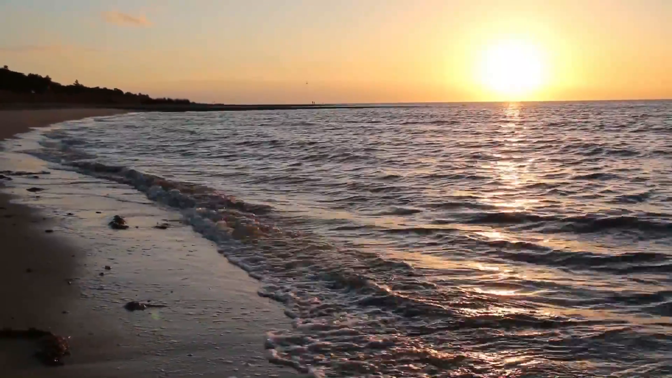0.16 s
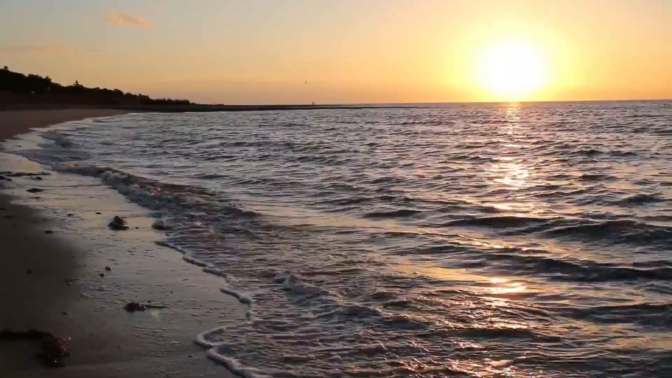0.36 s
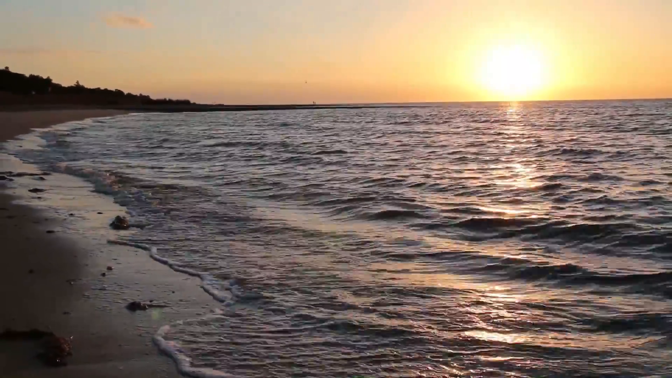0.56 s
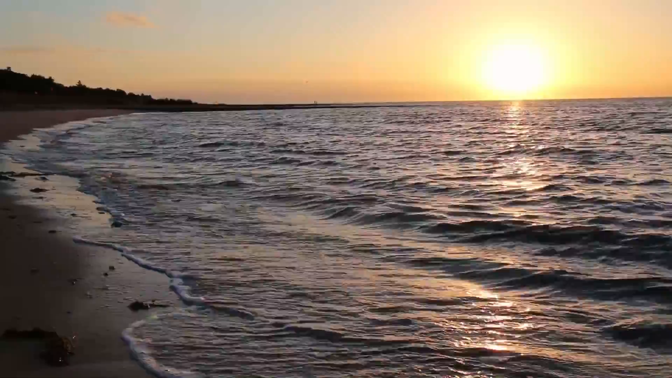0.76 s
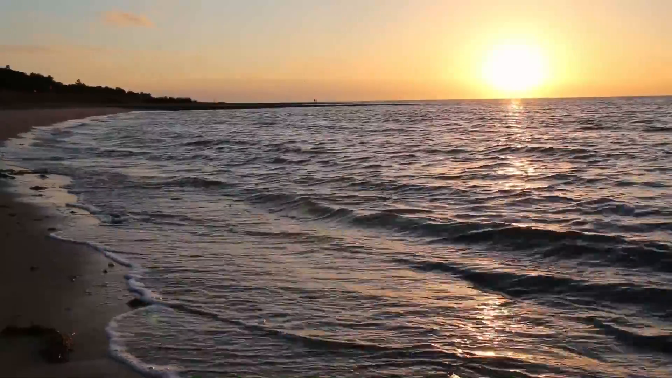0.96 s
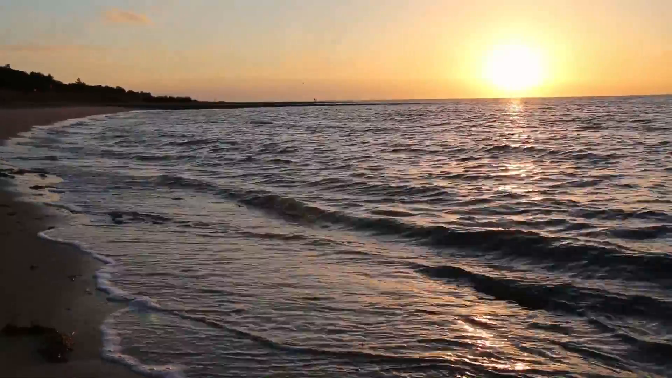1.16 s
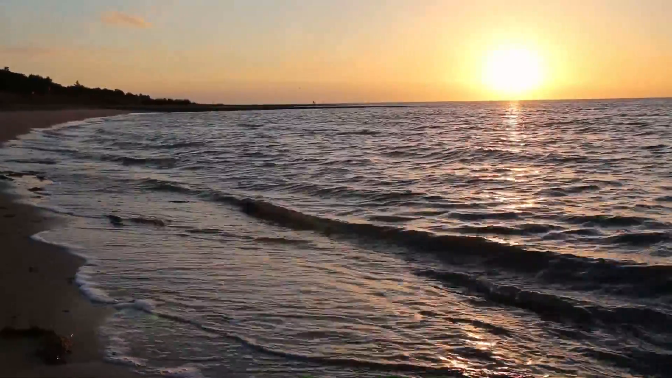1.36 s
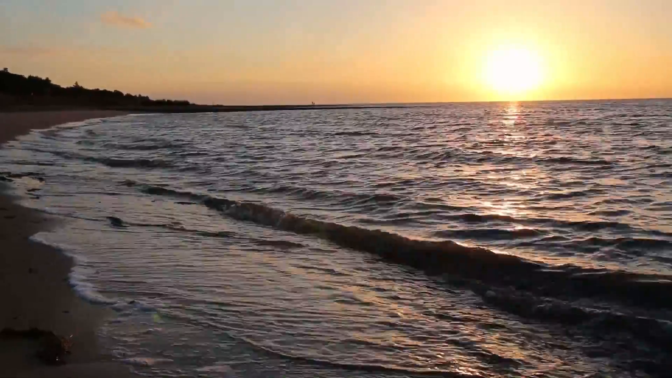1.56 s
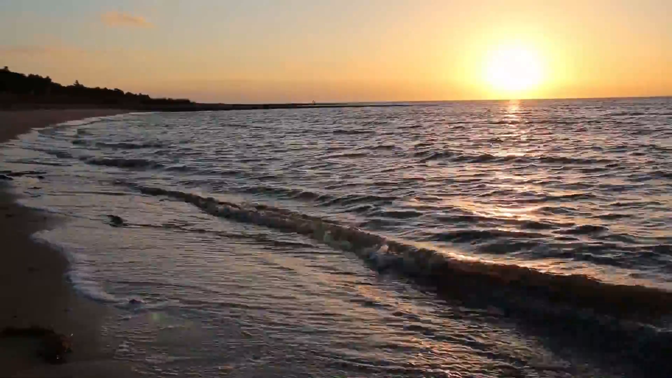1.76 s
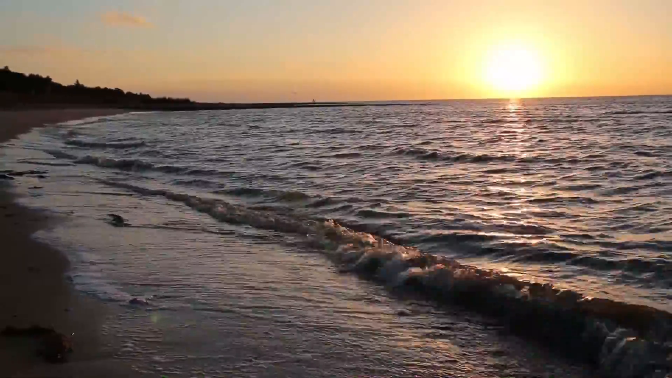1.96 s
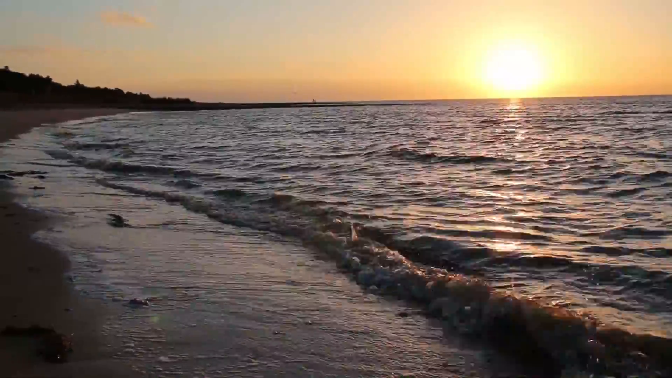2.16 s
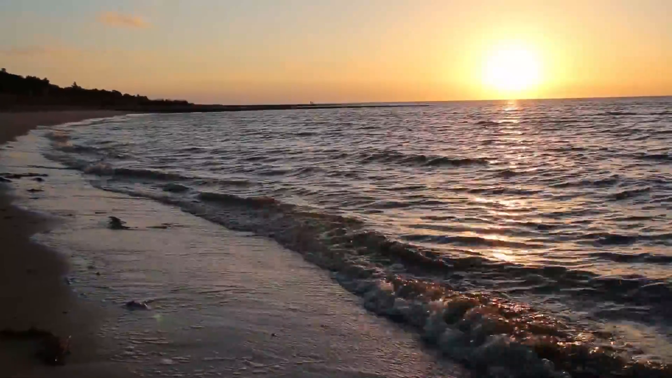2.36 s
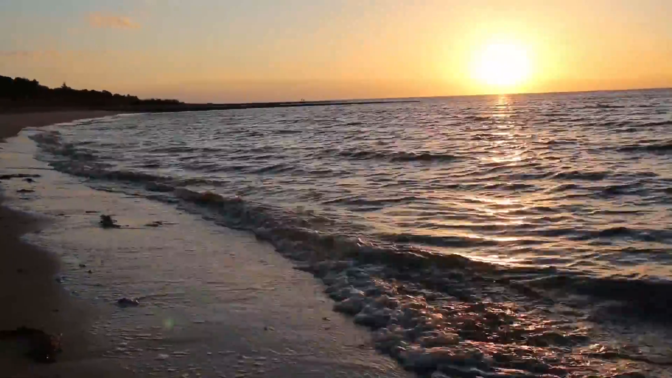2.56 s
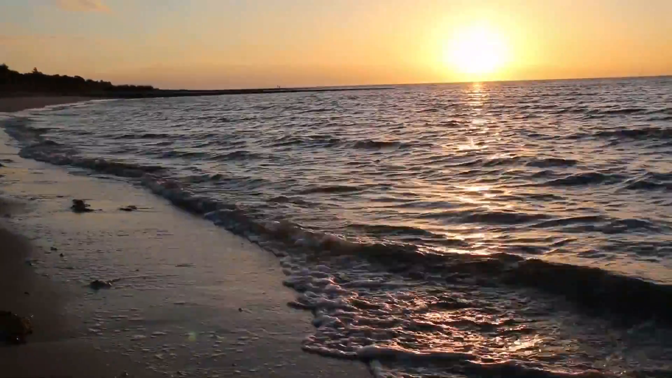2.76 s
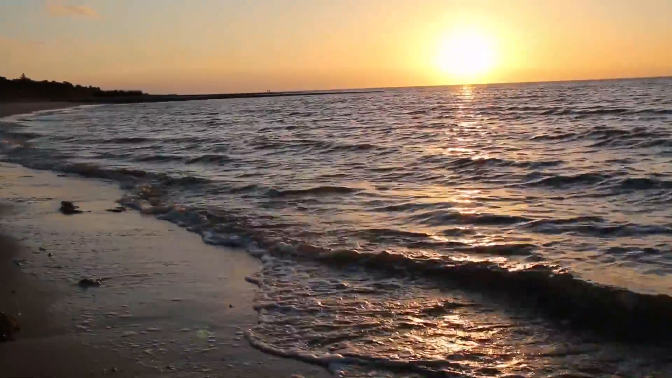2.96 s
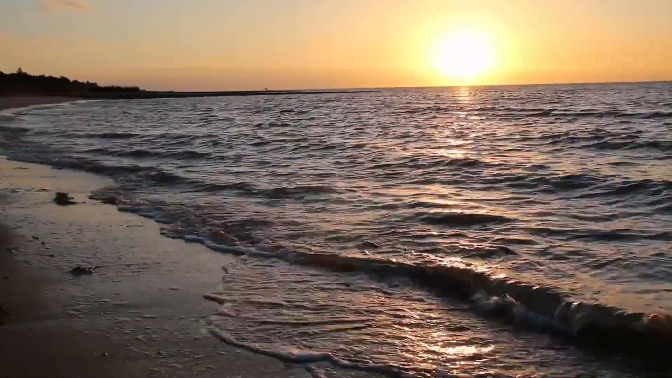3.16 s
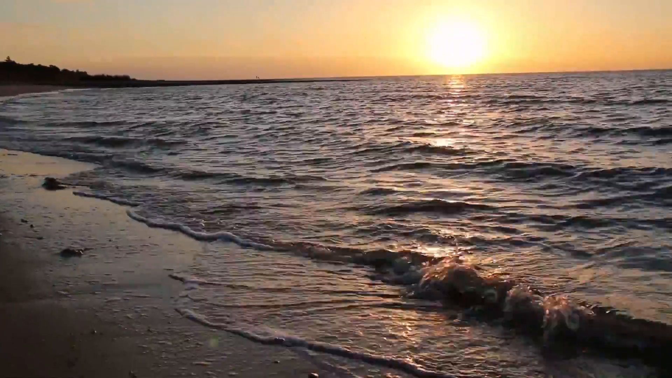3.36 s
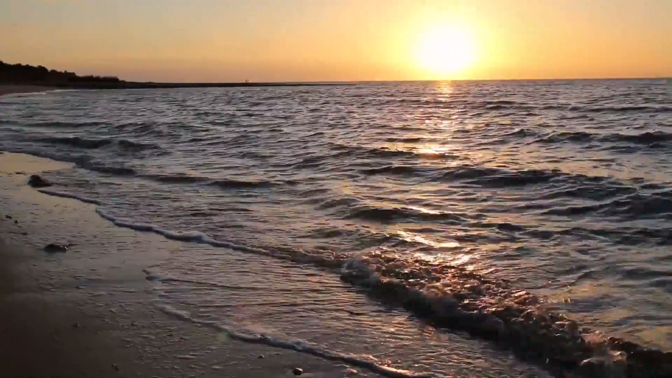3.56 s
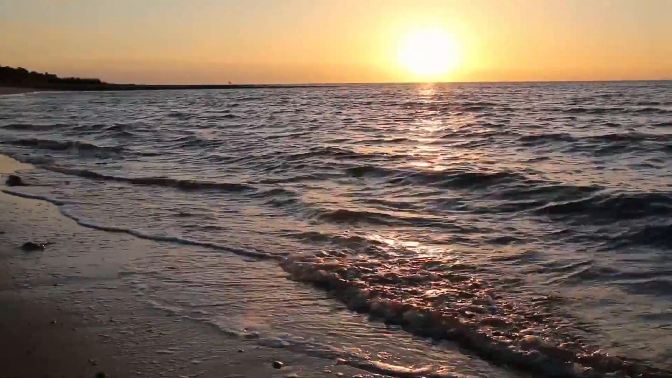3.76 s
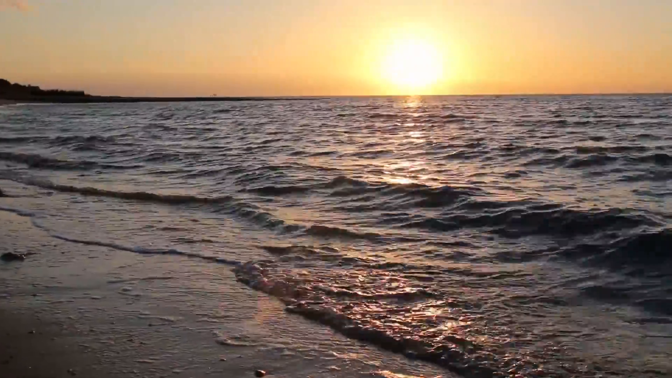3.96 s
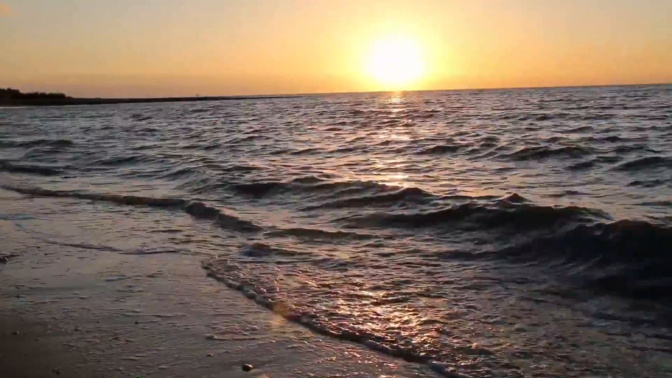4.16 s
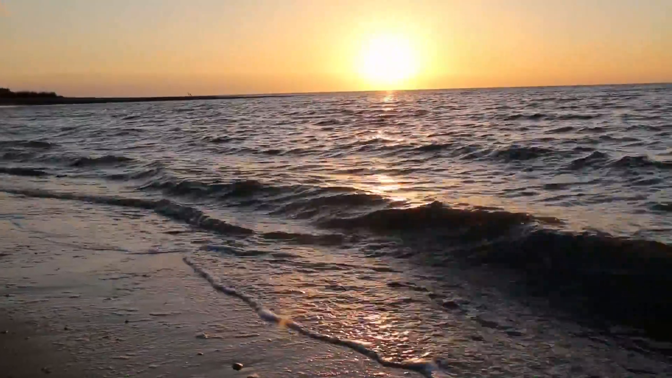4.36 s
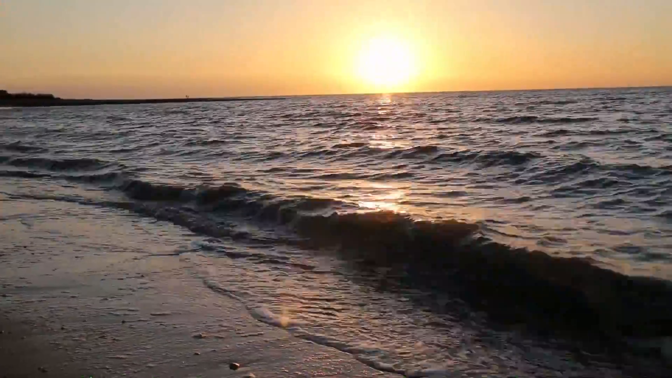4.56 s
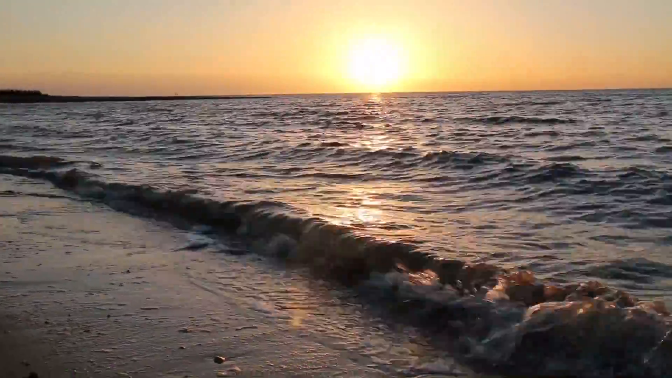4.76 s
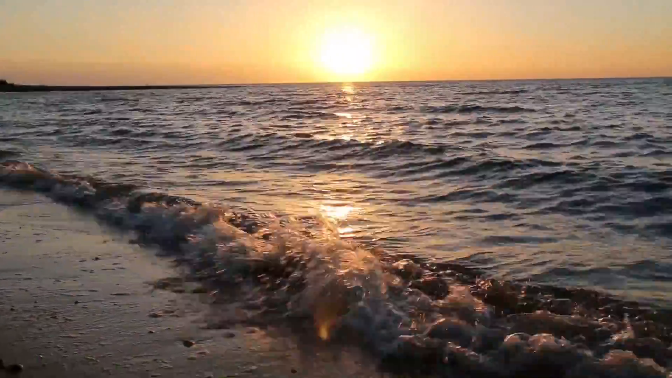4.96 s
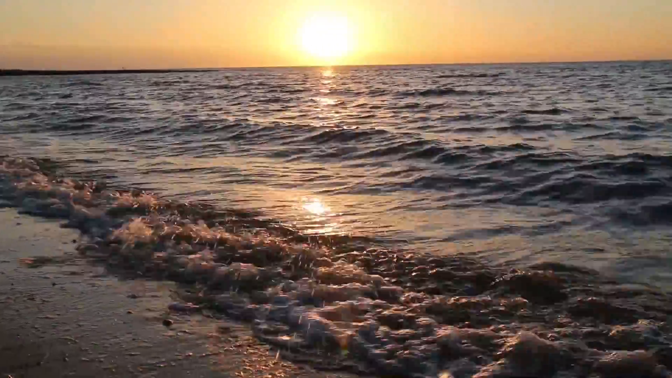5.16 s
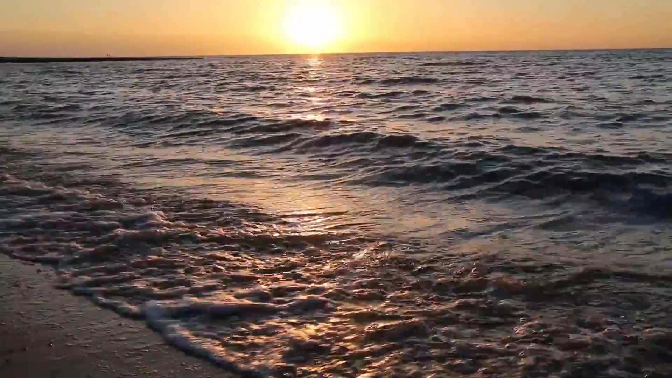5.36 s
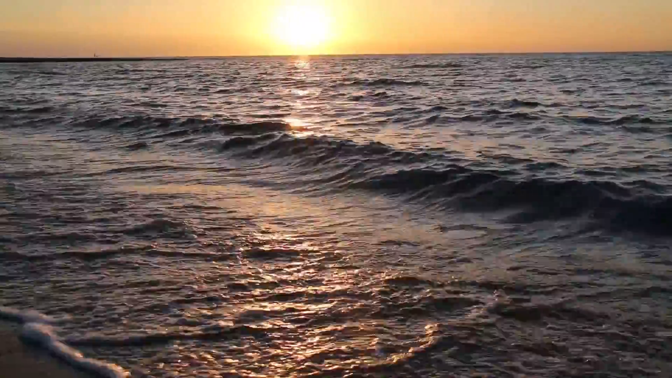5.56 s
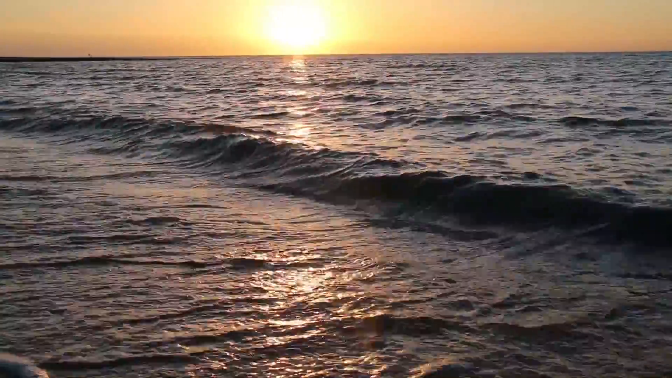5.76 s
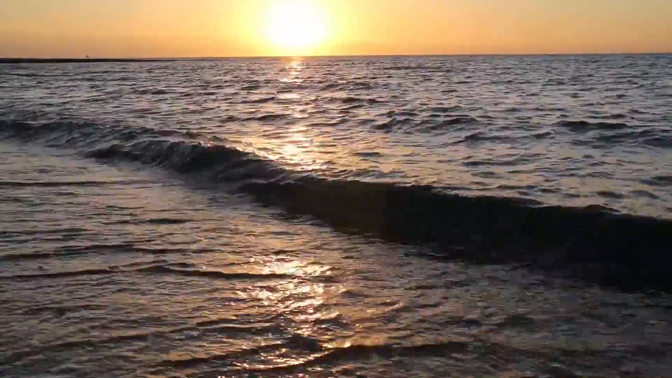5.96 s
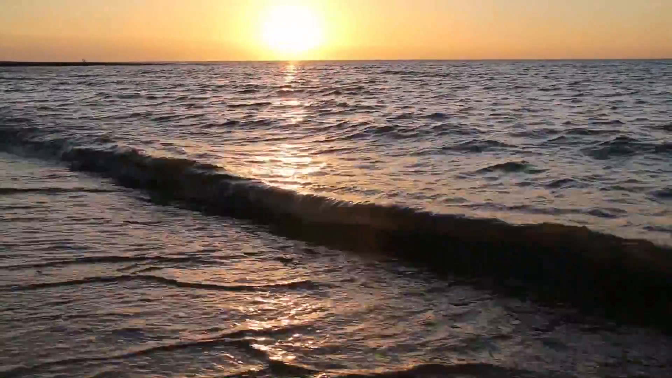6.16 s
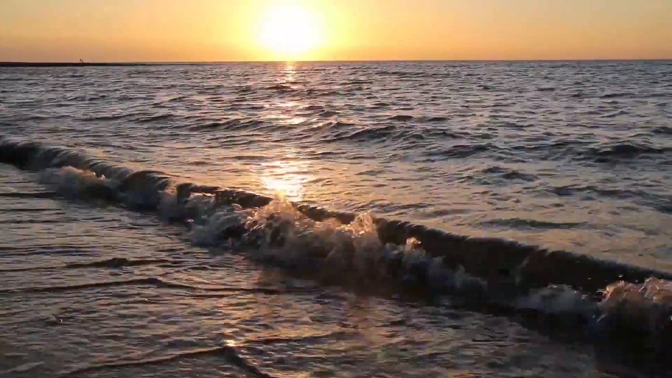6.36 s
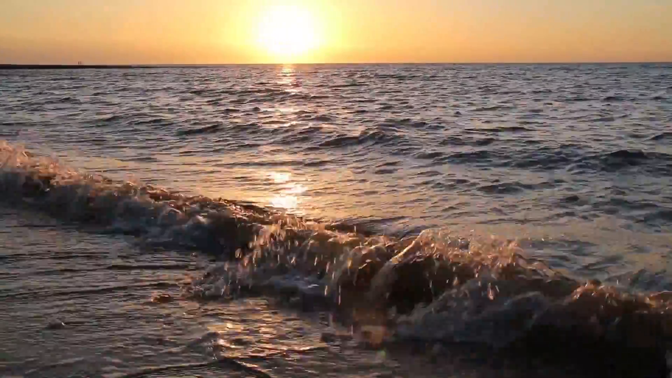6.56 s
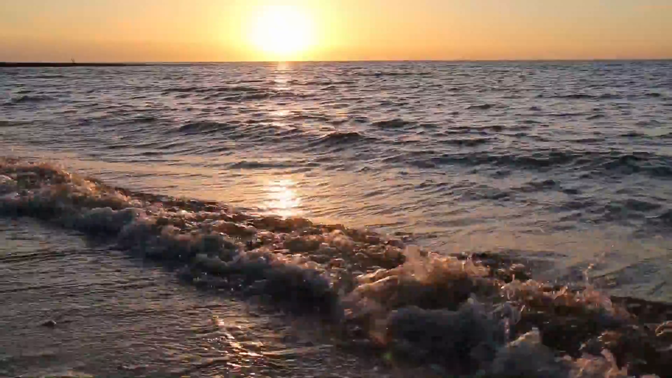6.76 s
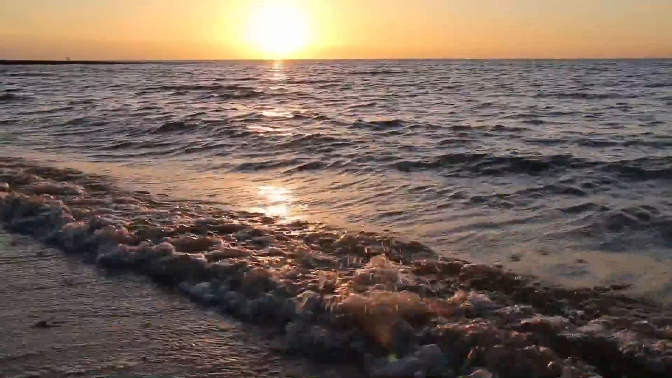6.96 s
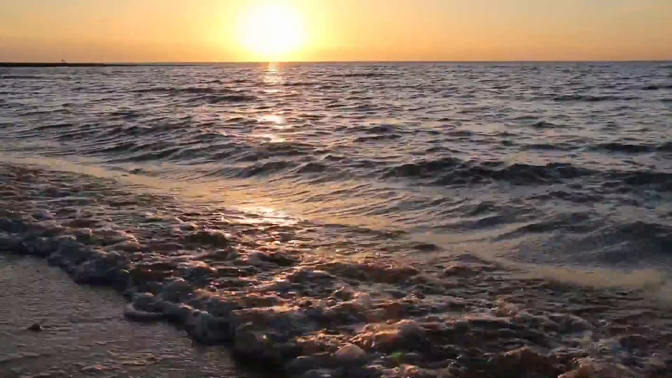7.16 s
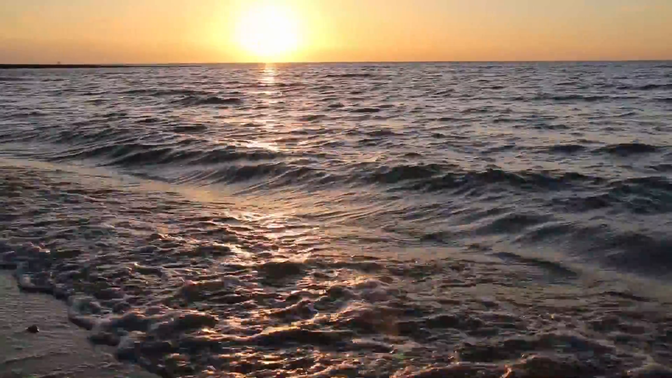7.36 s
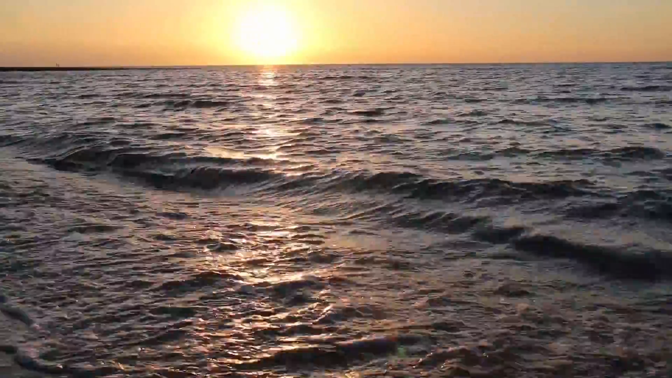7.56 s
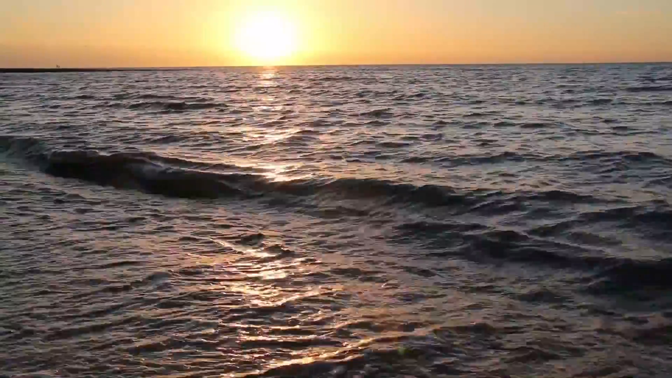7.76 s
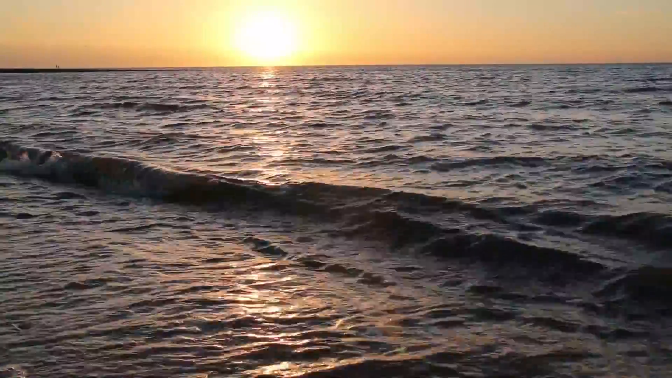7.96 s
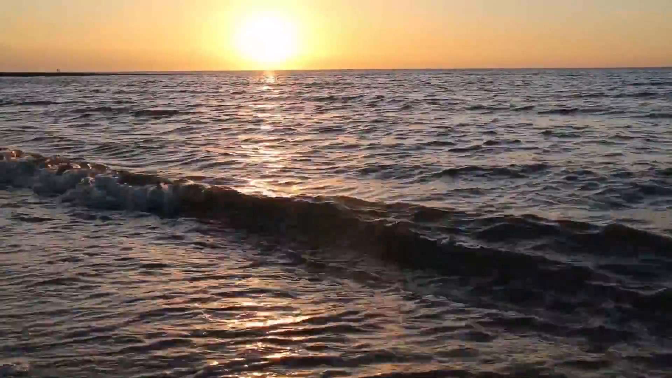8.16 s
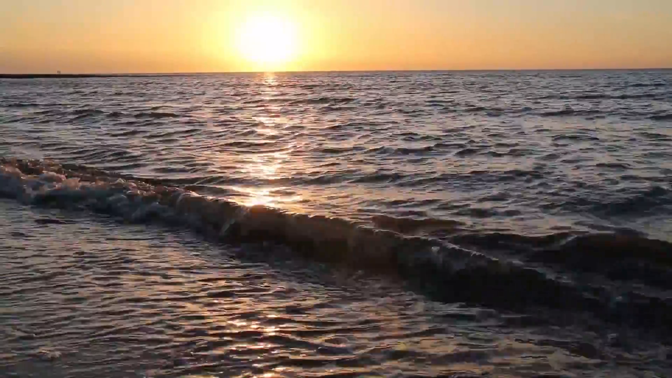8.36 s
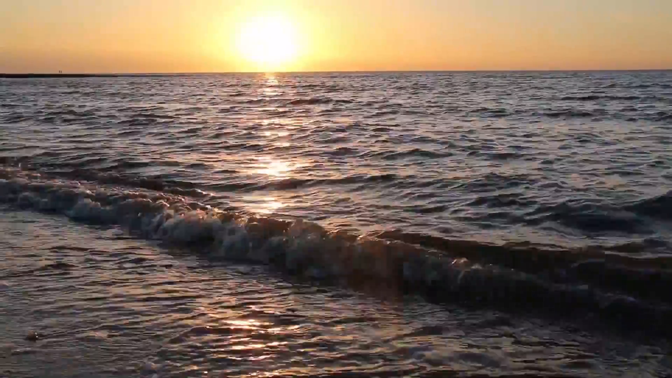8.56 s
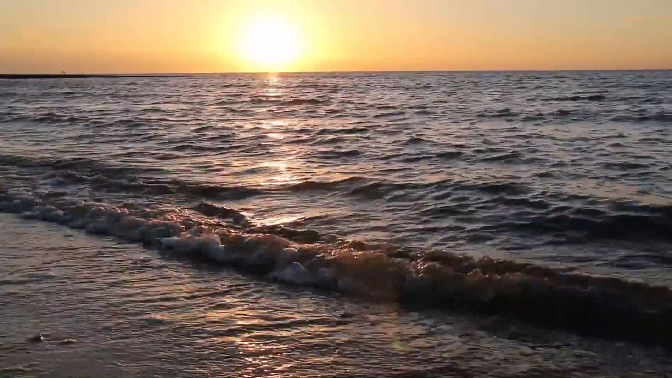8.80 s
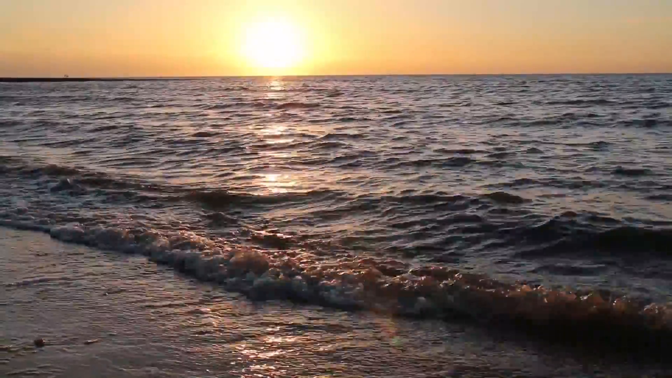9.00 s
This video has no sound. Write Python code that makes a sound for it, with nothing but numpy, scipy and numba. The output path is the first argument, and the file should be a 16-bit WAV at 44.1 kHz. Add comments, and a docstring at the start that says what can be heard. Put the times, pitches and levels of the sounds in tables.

```python
"""A sandy beach, a hand-held pair of microphones close to the water's edge.
From the start, light gusts rumble on each microphone by itself, over distant surf and a faint hiss.
After a second small waves break close by, mostly from right to left. Drips plink, big bubbles gulp,
swarms of them churn, spray hisses, drops slap the wet sand, and the foam runs up and fizzes out.
The strongest fall near 4.8 and 6.6 s, in a fresher wind; a softer one follows at about 8 s."""
import sys
import numpy as np
from scipy import signal
from scipy.io import wavfile
from numba import njit

SR = 44100
rng = np.random.default_rng(int(sys.argv[2]) if len(sys.argv) > 2 else 0)


def pcm_store(signal):
    """Save signal as 16-bit PCM."""
    levels = np.round(np.clip(np.atleast_2d(signal), -1, 1) * 32767)
    wavfile.write(sys.argv[1], SR, levels.astype(np.int16).T)


N = 398223


def from_db(db):
    """Decibels to gain."""
    return 10 ** (np.asarray(db) / 20)


def unit_rms(x):
    """Scaled to rms 1."""
    return x / np.sqrt(np.mean(x ** 2) + 1e-20)


def in_time(rows):
    """The columns of a curve table, one value a sample."""
    times, *columns = np.transpose(rows)
    return [np.interp(np.arange(N) / SR, times, column) for column in columns]


def at_hz(spectrum, hz):
    """A spectrum's level in dB, read on a log-frequency axis."""
    points_hz, level_db = np.transpose(spectrum)
    return np.interp(np.log(hz), np.log(points_hz), level_db)


def sides(pan_db):
    """Gains at the two microphones for a left-right level difference, power kept."""
    left = from_db(pan_db)
    return np.array([left, np.ones_like(left)]) * np.sqrt(2 / (1 + left ** 2))


def mix(a, b, share):
    """Two unrelated sounds of rms 1, b taking this share of the power."""
    return np.sqrt(1 - share) * a + np.sqrt(share) * b


def drift(rate_hz):
    """A slow random wander of spread 1: coarse noise through two one-pole low-passes."""
    hop, run_in = 40, 2000
    pole = np.exp(-2 * np.pi * hop * rate_hz / SR)
    noise = rng.standard_normal(N // hop + run_in + 2)
    slow = signal.lfilter([1], [1, -2 * pole, pole * pole], noise)[run_in:]
    return np.interp(np.arange(N) / hop, np.arange(len(slow)), unit_rms(slow))


def banded_noise(spectrum, alike, flicker_db, flicker_hz):
    """Stereo noise in roughly half-octave bands, each flickering by itself; rms 1."""
    low_hz, high_hz = spectrum[0][0], spectrum[-1][0]
    edges = np.geomspace(low_hz, high_hz, int(2 * np.log2(high_hz / low_hz)) + 2)
    white = rng.standard_normal((2, 2, N))
    out = 0
    for k, (low, high) in enumerate(zip(edges, edges[1:])):
        band = signal.butter(2, [low, high], "band", fs=SR, output="sos")
        mid, side = signal.sosfilt(band, white[k % 2])   # neighbouring bands get unrelated noise
        gain = from_db(at_hz(spectrum, np.sqrt(low * high)) + flicker_db * drift(flicker_hz))
        same = alike / (1 + (low / 10500) ** 4)   # short waves differ between the microphones
        out = out + gain * (np.sqrt(1 + same) * mid + np.sqrt(1 - same) * side * [[1], [-1]])
    return unit_rms(out)


@njit
def ring_bubbles(out, start, step, rise, cycles, swell, left, right):
    """Adds bubbles: sines that swell briefly, climb in pitch and fade at 60 dB in so many cycles."""
    for k in range(len(start)):
        life = cycles[k] * 2 * np.pi / step[k]
        phase, fade, closed = 0.0, 1.0, 1.0
        fall = 1000.0 ** (-1 / life)
        open_up = np.exp(-1 / (swell * life + 1e-9))
        for i in range(min(int(.7 * life), out.shape[1] - start[k])):
            phase += step[k] * (1 + rise[k] * i / life)
            fade *= fall
            closed *= open_up
            ring = np.sin(phase) * fade * (1 - closed)
            out[0, start[k] + i] += ring * left[k]
            out[1, start[k] + i] += ring * right[k]


def swarm(spectrum, count, cycles, rise, uneven_db, spread_db):
    """Bubbles born at random, of uneven size, each at its own place along the wave; rms 1."""
    when, pitch, size, place = rng.random((count, 4)).T
    hz = spectrum[0][0] * (spectrum[-1][0] / spectrum[0][0]) ** pitch
    # pitches are spread evenly in octaves and high bubbles are short: 6 dB an octave keeps the colour
    gain = from_db(at_hz(spectrum, hz) - uneven_db * np.log(1 - .995 * size)) * hz
    left, right = gain * sides(spread_db * (2 * place - 1))
    start = (when * N).astype(np.int64)
    out, each = np.zeros((2, N)), np.ones(count)
    ring_bubbles(out, start, 2 * np.pi * hz / SR, rise * each, cycles * each, 0.02, left, right)
    return unit_rms(out)


# The breeze at the microphones: (time [s], level [dB])
BREEZE = [(0, -45), (1.3, -51.5), (2.1, -47.5), (2.9, -42.5), (3.2, -49), (3.5, -43.5), (4.0, -44.5),
          (4.12, -39.5), (4.7, -39), (4.85, -44), (5.3, -38), (6.55, -41), (7.2, -39.5), (8.3, -40),
          (9.03, -43.5)]
# Gusts on top of it: (time [s], half length [s], lift [dB], left-right [dB])
GUSTS = [(.1, .07, 4.5, 2), (1.09, 0.087, 7, 5), (1.42, .07, 4.5, 3), (1.953, 0.039, 4, -2),
         (2.67, 0.11, 1, 2), (3.78, 0.068, 2.5, 1), (5.617, 0.078, 6.5, 7.5), (5.975, 0.12, 4, 3),
         (6.28, 0.086, 8.5, 2), (7.448, 0.16, 8, 1), (7.82, 0.056, 7, -2), (8.032, .08, 4, 5.5),
         (8.753, 0.16, 5.5, 1)]
# Rumble right on the microphone ports: (frequency [Hz], density [dB])
RUMBLE = [(14, -30), (22, -2.5), (44, 1.5), (87, -4.5), (110, -9), (180, -16.5), (260, -23), (420, -36)]


def wind():
    """Eddies push on each port separately, in lumps and quick flutters; harder gusts reach higher."""
    level_db, = in_time(BREEZE)
    pan_db, t = np.zeros(N), np.arange(N) / SR
    for at_s, half_s, lift_db, side_db in GUSTS:
        bell = np.exp(-((t - at_s) / half_s) ** 2)
        level_db += lift_db * bell
        pan_db += side_db * bell
    port_db = level_db + np.array([1.6 * drift(11.5) + 2.52 * drift(16.4) for port in range(2)])
    rumble = banded_noise(RUMBLE, alike=0.15, flicker_db=1.27, flicker_hz=6.1)
    edge = signal.sosfilt(signal.butter(2, 110, "high", fs=SR, output="sos"), rumble)
    edge_gain = from_db(0.04 * (port_db + 38)) - 1
    # sqrt(2): unrelated noises average to half their power
    return np.sqrt(2) * from_db(port_db) * sides(pan_db) * (rumble + edge_gain * edge)


# Distant surf and, above 11 kHz, microphone hiss: (frequency [Hz], density [dB])
SURF_AND_HISS = [(180, -40), (300, -6), (900, -6), (1400, -11), (2200, -13.5), (6000, -19.5),
                 (11500, -21.5), (16000, -22.5)]


def far_surf_and_hiss():
    """A steady wash of distant surf, a little to the right, with faint microphone hiss at the top."""
    steady = banded_noise(SURF_AND_HISS, alike=0.11, flicker_db=1.1, flicker_hz=23)
    return from_db(-54) * steady * from_db([[-.8], [.8]])


# Bubble clouds in the nearest breakers: (frequency [Hz], density [dB])
CHURN = [(450, -12), (650, -5), (900, 0), (1330, -3.5), (1900, -13.5), (2800, -16)]


def churn():
    """Trapped air breaks into swarms of bubbles that ring together."""
    noise = banded_noise(CHURN, alike=0.72, flicker_db=0.5, flicker_hz=3.3)
    bubbles = swarm(CHURN, count=20000, cycles=18.5, rise=0.48, uneven_db=2.0, spread_db=5.0)
    return mix(noise, bubbles, share=0.6)


# Small bubbles close by, wide across the pair: (frequency [Hz], density [dB])
PLIPS = [(500, 3.5), (1000, -2.5), (2000, -6.5), (4000, -18.5)]


def plips():
    """Lone bubbles ring long enough to be heard as clear rising notes."""
    return swarm(PLIPS, count=1500, cycles=27.0, rise=0.54, uneven_db=1.5, spread_db=17.0)


# The low body of a near breaker: (frequency [Hz], density [dB])
POCKETS = [(140, -10.5), (210, -7.5), (320, -2), (480, 0), (650, -6.5), (900, -11)]


def pockets():
    """Big pockets of air ring low and die within a few cycles."""
    noise = banded_noise(POCKETS, alike=0.94, flicker_db=1.5, flicker_hz=24)
    bubbles = swarm(POCKETS, count=4000, cycles=9.6, rise=0.71, uneven_db=3.0, spread_db=2.0)
    return mix(noise, bubbles, share=0.62)


# Spray in front of the microphones: (frequency [Hz], density [dB])
SPRAY = [(1300, 4.5), (1800, -3.5), (2400, 0), (3200, -2.5), (4800, -7), (7000, -11.5)]


def spray():
    """Spray hisses off the crest, bright with tiny bubbles."""
    noise = banded_noise(SPRAY, alike=0.81, flicker_db=1.5, flicker_hz=11.5)
    bubbles = swarm(SPRAY, count=20000, cycles=16.0, rise=0.47, uneven_db=3.5, spread_db=10.0)
    return mix(noise, bubbles, share=0.39)


# Foam on the near water: (frequency [Hz], density [dB])
FOAM = [(4000, -8.5), (5500, -5), (7200, -2), (10000, -6), (12500, -18), (16000, -14)]


def foam():
    """The finest bubbles fizz, and lone films burst with a tick."""
    noise = banded_noise(FOAM, alike=0.51, flicker_db=3.1, flicker_hz=32)
    bubbles = swarm(FOAM[:-1], count=30000, cycles=12.4, rise=0.18, uneven_db=2.5, spread_db=3.0)
    ticks = swarm(FOAM[:-1], count=260, cycles=1.8, rise=.1, uneven_db=4.0, spread_db=10.0)
    return mix(noise, bubbles, share=0.49) + from_db(-16.5) * ticks


# Stretches of crest falling close by, and ripples lapping between; climb and fade span 20 dB:
# (time at full strength [s], climb [s], hold [s], fade [s], churn [dB], spray [dB], leftward lean [dB])
PLUNGES = [(-.55, .3, 0.38, 0.47, -38.5, -45, -2), (0.37, 0.82, 0.25, 0.33, -53.5, -61.5, 0),
           (1.225, 0.23, 0.26, 0.28, -53, -59.5, -22.5), (1.605, 0.59, 0.068, .3, -56.5, -56.5, 0),
           (1.725, 0.11, .04, .3, -55, -53.5, -3), (1.803, 0.11, 0.31, 0.71, -44.5, -44.5, -6.5),
           (2.287, 0.31, .08, 0.84, -47, -53.5, -2.5), (2.798, 0.48, 0.24, 0.33, -54.5, -61, 2),
           (3.137, .05, .1, 0.39, -59.5, -55.5, -8), (3.355, 0.17, 0.18, 0.56, -48, -52.5, -6),
           (3.85, .3, 0.18, 1, -61.5, -71.5, -7.5), (4.352, 0.19, 0.071, 0.24, -49.5, -47, -14),
           (4.54, 0.23, 0.11, 0.58, -43, -43, -16), (4.77, 0.28, 0.13, 0.39, -39, -42.5, -6.5),
           (5.004, 0.14, 0.081, 0.31, -42, -44.5, 2), (5.129, .08, 0.045, 0.16, -41.5, -47, 2),
           (5.797, .8, 0.26, 0.23, -54, -70, 4), (6.098, 0.14, 0.09, 0.29, -53.5, -56.5, -16),
           (6.257, 0.037, .03, .3, -45, -39, -10), (6.39, 0.22, 0.054, 0.57, -44.5, -40, -8),
           (6.627, 0.26, 0.054, 0.42, -33, -35.5, -8), (6.90, 0.23, 0.04, 0.28, -48, -46, 1),
           (7.406, 0.36, .4, 0.35, -53.5, -75, 4), (7.934, 0.14, 0.033, .4, -47.5, -47.5, 0),
           (8.205, 0.39, 0.042, 1, -44.5, -50, 3), (8.582, 0.74, 0.16, 1, -47, -48, -2.5),
           (8.98, 0.97, 0.082, .48, -52.5, -51.5, -16)]


def waves():
    """The plunges add their power; gives churn, spray, wash and lean in dB, one value a sample."""
    step_s, wash_lag_s, wash_spread_s = .002, 0.59, 0.11
    t = np.arange(-1, N / SR + step_s, step_s)
    at_s, climb, hold, fade, churn_db, spray_db, lean_db = np.array(PLUNGES).T[:, :, None]
    before, after = (at_s - t) / climb, (t - at_s - hold) / fade
    down_db = 20 * np.maximum(np.maximum(before, after), 0)
    plunge_power = from_db(2 * (churn_db - down_db))
    churn_power = plunge_power.sum(axis=0)
    spray_power = from_db(2 * (spray_db - down_db)).sum(axis=0)
    mean_lean_db = (plunge_power * lean_db).sum(axis=0) / churn_power
    # the foam reaches the sand later, smeared in time
    late = np.maximum(t - t[0] - wash_lag_s, 0) / wash_spread_s
    run_up = late * np.exp(-late) * step_s / wash_spread_s
    arriving = np.convolve(spray_power, run_up)[:len(t)]
    wash_power = 1e-12 + from_db(2 * -57) * (arriving / from_db(2 * -42)) ** 0.9   # -42 dB in, -57 out
    levels_db = 10 * np.log10([churn_power, spray_power, wash_power])
    return in_time(np.transpose([t, *levels_db, mean_lean_db]))


def breakers(churn_db, spray_db, lean_db):
    """Churn, pockets, spray and foam burst together as tongues of the crest fall one after another."""
    unevenness = np.clip((-28 - churn_db) / 22, .45, 1)   # many tongues at once even each other out
    bursts = unevenness * (0.88 * drift(6.2) + 1.2 * drift(34))
    clouds = churn()
    lone = from_db(-4.5 - 0.19 * (churn_db + 47)) * plips()   # they stand out most in slack water
    deep = from_db(-2 + 0.3246 * (churn_db + 44)) * pockets()   # stronger waves sound deeper
    body = from_db(1.4 * bursts) * (clouds + deep) + lone
    hiss = from_db(spray_db) * spray() * sides(0.73 * lean_db)
    fizz = from_db(spray_db - 5.5) * foam() * sides(0.23 * lean_db)   # the treble tells the side less
    return from_db(churn_db) * body * sides(0.75 * lean_db) + from_db(1.05 * bursts) * (hiss + fizz)


# Foam on the sand, equally loud at both microphones: (frequency [Hz], density [dB])
SAND_FIZZ = [(3500, -2), (5500, -3.5), (8000, -1.5), (10500, -4.5), (13000, -9), (16000, -16)]


def sand_wash(wash_db):
    """After each wave the foam runs up the sand and fizzes out evenly."""
    return from_db(wash_db) * banded_noise(SAND_FIZZ, alike=0.51, flicker_db=0.0, flicker_hz=11)


# Single bubbles and drips close by: (time [s], peak [dB], starting pitch [Hz], climb [octaves])
BUBBLES_AND_DRIPS = [(1.188, -43, 2420, .2), (1.216, -41, 2200, .15), (1.345, -39.5, 437, 0.19),
                     (1.392, -39, 1300, .15), (1.526, -45, 2400, .15), (1.536, -43, 1070, 0.24),
                     (1.598, -44, 2210, 0.088), (1.375, -41, 1120, 0.43), (1.697, -39, 1200, .2),
                     (1.792, -33.5, 663, .18), (2.040, -31.5, 710, 0.21), (3.175, -37, 1070, .14),
                     (3.382, -37, 970, .15), (3.408, -45, 320, 0.18), (3.472, -36, 910, .2),
                     (3.515, -30.5, 435, .17), (3.562, -34, 1000, 0.24), (3.930, -45.5, 493, 0.11),
                     (4.212, -43, 625, 0.092), (4.513, -35.5, 197, 0.072), (4.513, -30.5, 500, 0.14),
                     (4.890, -27, 466, 0.16), (5.508, -44, 1080, .4), (5.625, -50, 910, 0.28),
                     (6.100, -38, 1120, 0.99), (6.265, -31, 920, .24), (6.275, -37, 1300, 0.83),
                     (6.325, -32.5, 494, .1), (6.541, -30.5, 404, .18), (6.579, -28.5, 434, 0.27),
                     (6.640, -32, 407, .2), (6.725, -31, 405, 0.27), (7.169, -40, 1510, 0.12),
                     (8.133, -38, 287, 0.58), (8.248, -33, 800, 0.36), (8.634, -33, 663, 0.32)]


def bubbles_and_drips(lean_db):
    """Each rings alone where the wave breaks, rising in pitch: big ones gulp low, small ones plink high."""
    at_s, peak_db, hz, octaves = np.transpose(BUBBLES_AND_DRIPS)
    start = (at_s * SR).astype(np.int64)
    swell, age = 0.08, np.linspace(0, 1, 200)   # as shares of a bubble's life
    envelope_peak = np.max(1000.0 ** -age * (1 - np.exp(-age / swell)))
    left, right = from_db(peak_db) / envelope_peak * sides(lean_db[start])
    rise = 3 * (2 ** octaves - 1)   # the listed climb takes the first third, while the bubble is loud
    cycles = 17.2 + 23.2 * octaves   # bubbles that climb far ring longer
    out = np.zeros((2, N))
    ring_bubbles(out, start, 2 * np.pi * hz / SR, rise, cycles, swell, left, right)
    return out


# Drops landing near the microphones: (time [s], peak [dB], pitch [Hz], left-right [dB])
DROPS = [(1.326, -40, 3380, -15), (1.341, -34, 2880, -15), (1.7942, -39, 2740, -3.0),
         (2.363, -31, 3390, -2), (3.1313, -38.5, 4250, -1.5), (3.355, -32.5, 6300, -3.0),
         (3.447, -33.5, 4280, 0), (3.4602, -35, 2730, -3.0), (4.332, -31, 2840, -11),
         (4.4119, -28.5, 5200, -6.5), (4.4593, -34, 6350, -7.0), (5.8614, -36.5, 3540, -17),
         (6.2492, -27, 2800, -20), (7.1462, -35, 2590, 2), (7.8396, -30, 6320, -13),
         (7.9594, -35, 5800, -1.5), (8.6067, -31, 3770, 2), (8.644, -30, 3600, 2)]


def drop_slaps():
    """A drop hits wet sand: a soft tick and a short spatter of noise around its own pitch."""
    out, t = np.zeros((2, N)), np.arange(1500) / SR
    envelope = np.exp(-t / 0.0017) + 0.54 * np.exp(-t / 0.0054)
    for at_s, peak_db, hz, pan_db in DROPS:
        band = signal.butter(2, [hz * 0.41, hz * 1.33], "band", fs=SR, output="sos")
        spatter = signal.sosfilt(band, rng.standard_normal(len(t)) * envelope)
        spatter *= from_db(peak_db) / np.abs(spatter).max()
        start = round(at_s * SR)
        out[:, start:start + len(t)] += np.outer(sides(pan_db), spatter)
    return out


def scene():
    """From the water's edge: foam on the sand, far surf and hiss, breakers close by, wind on the ports."""
    churn_db, spray_db, wash_db, lean_db = waves()
    backdrop = sand_wash(wash_db) + far_surf_and_hiss()
    near_water = breakers(churn_db, spray_db, lean_db) + bubbles_and_drips(lean_db) + drop_slaps()
    return backdrop + near_water + wind()


def record(dry):
    """The microphone chain cuts the deepest bass gently and the top steeply."""
    low_cut = signal.butter(1, 12, "high", fs=SR, output="sos")
    high_cut = signal.ellip(16, .3, 90, 15720, fs=SR, output="sos")
    return signal.sosfilt(high_cut, signal.sosfilt(low_cut, dry))


dry = scene()
out = record(dry)
pcm_store(out)
```